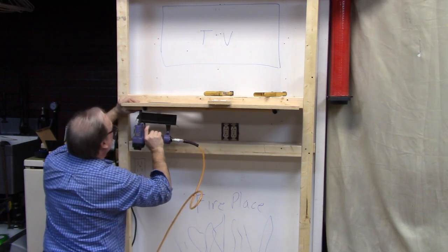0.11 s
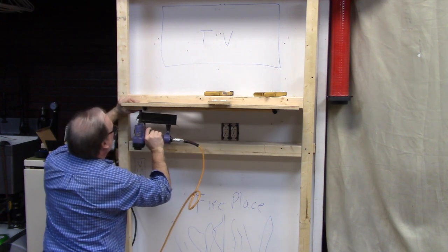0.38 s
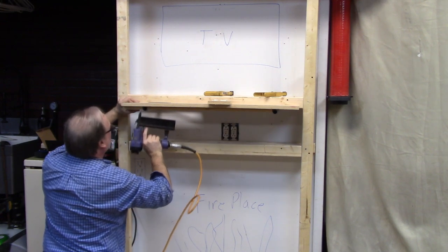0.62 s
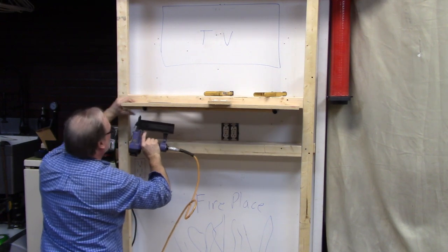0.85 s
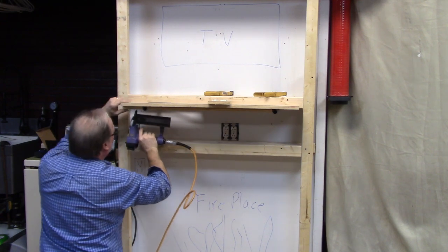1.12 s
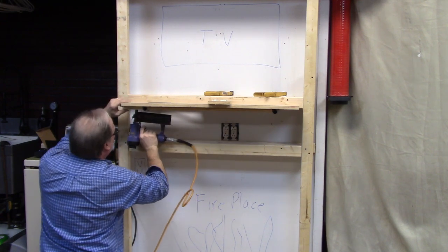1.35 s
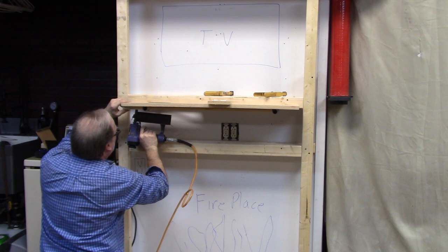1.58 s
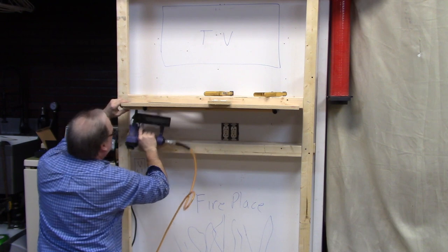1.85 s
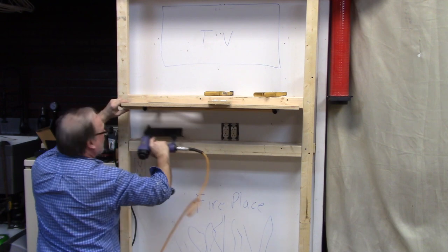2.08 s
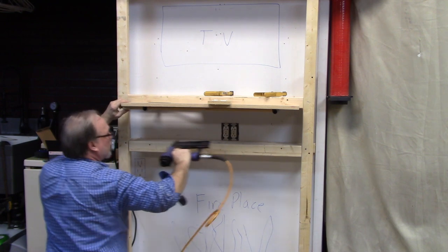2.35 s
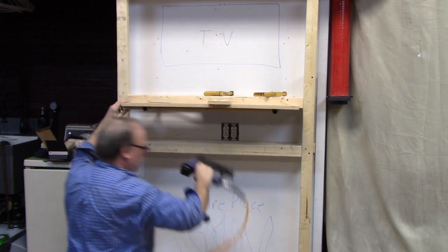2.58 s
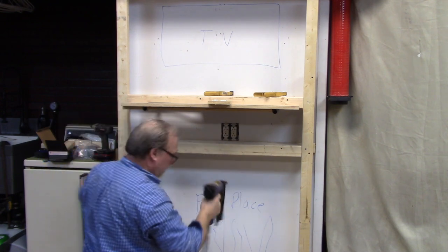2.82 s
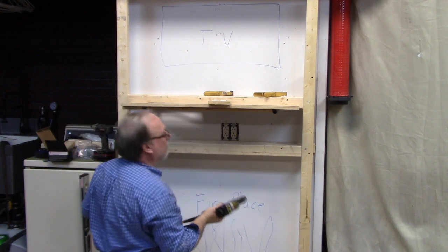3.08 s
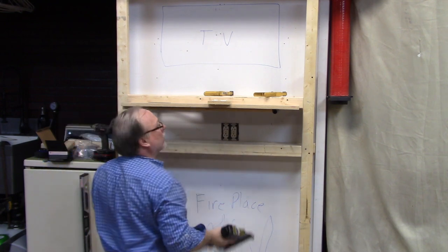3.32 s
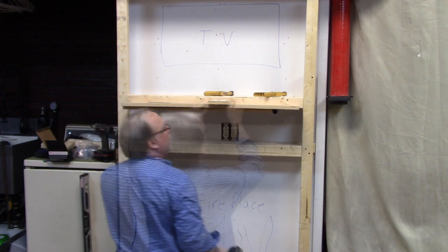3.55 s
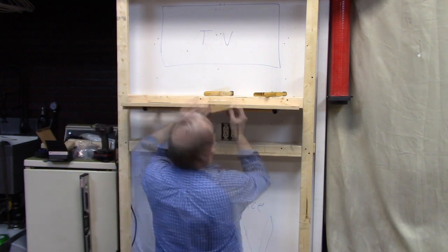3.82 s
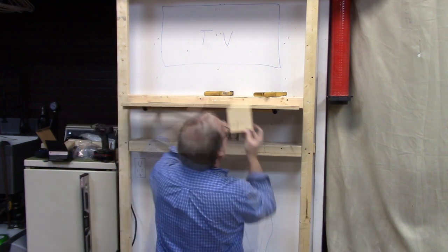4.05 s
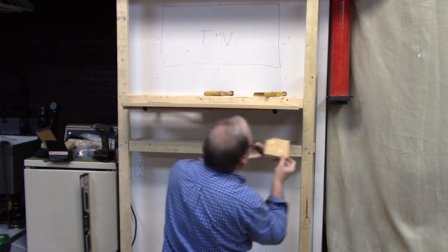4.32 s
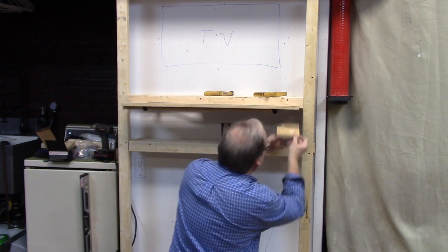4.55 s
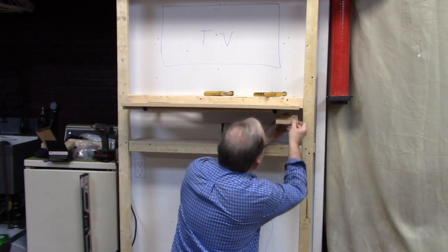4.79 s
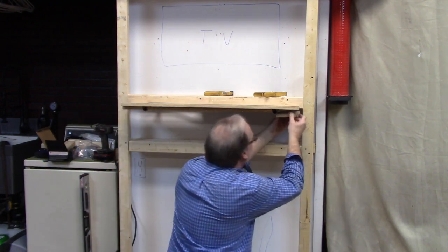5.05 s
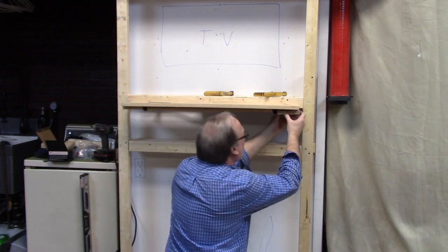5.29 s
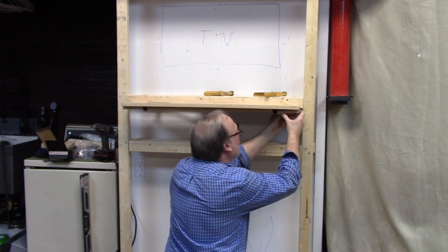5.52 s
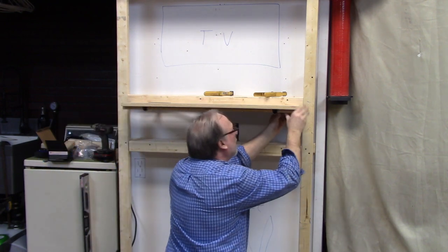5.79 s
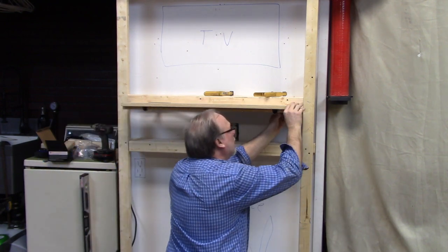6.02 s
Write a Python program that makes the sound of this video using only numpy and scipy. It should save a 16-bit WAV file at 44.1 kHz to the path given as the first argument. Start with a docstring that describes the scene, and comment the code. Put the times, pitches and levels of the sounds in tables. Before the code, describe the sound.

A workshop with a short ringing room and faint steady low air, heard by one fixed microphone; loud peaks are clamped. At 0 s a scraping tail dies away with low wooden knocks. At about 0.35 s an air nailer fires: a tiny hiss, a hard crack into wood, then at 0.53 s a bright exhaust puff and a return clack. Around 1.12-1.17 s tool bumps and dull wood thumps cluster with a short skid, and softer knocks follow at 1.34 s. The second, similar shot comes at 1.62 s, exhausting at 1.82 s. A bump at 1.95 s and small taps lead to clunks at 2.6 and 2.8 s, with raspy tool and hose drags until 3.5 s. A faint slide passes near 4 s. From 4.5 s a wood block scrapes, clicks at 4.72-4.77 s, knocks strongly at 4.93 s, then settles with lighter taps until 5.66 s and quiet air.

```python
"""In a workshop a dying tail and low knocks are heard, then an air nailer fires twice into a wooden frame.
Each shot is jets of coloured noise (valve hiss, blast, exhaust) and two hard stops of the piston.
Between and after the shots the tool and its hose bump, skid and drag: struck bodies ring, dense clicks rub.
After a faint slide, a small block is slid along a shelf and knocked into place.
All along the room rings on, steady air is heard, and a fast limiter holds the loud moments down."""
import sys
import numpy as np
from scipy import signal
from scipy.fft import rfft, irfft
from scipy.io import wavfile
from scipy.ndimage import uniform_filter1d

SR = 44100
rng = np.random.default_rng(int(sys.argv[2]) if len(sys.argv) > 2 else 0)


def to_wav(s):
    """Save 16-bit WAV."""
    ch = np.atleast_2d(s).T  # columns
    pcm = np.round(np.clip(ch, -1, 1) * 32767)  # PCM
    wavfile.write(sys.argv[1], SR, pcm.astype(np.int16))


def boost(x):
    """Linear amplitude factor 10**(x/20) for a level x in decibels (scalar or array-like)."""
    u = np.asarray(x, float) / 20
    return 10 ** u


N = 271215  # length in samples

# The shots. Each row: valve opens in seconds, trigger held in seconds, pressure in dB.
SHOTS = [(.341, .186, 0.5), (1.617, .1985, 1.5)]
# Colour of the air through the wide open valve. Each row: frequency in Hz, relative level in dB per Hz.
VALVE_COLOUR = [(88, -32), (150, -15.5), (913, -17.5), (1270, -8), (1840, -29.5), (2660, -0.5),
                (2930, -4.5), (3160, -3), (10300, -6.5), (15600, -6.5)]
# Colour of the piston driving the nail. Each row: frequency in Hz, relative level in dB per Hz.
DRIVE_COLOUR = [(30, -57), (60, -18), (250, -6.5), (450, -8.5), (700, -4), (1300, -1), (2200, -2.5),
                (2700, -12.5), (3500, -21), (4600, -34)]
# Colour of the air bursting out after the blow. Each row: frequency in Hz, relative level in dB per Hz.
BLAST_COLOUR = [(1470, -24.5), (2500, -10.5), (3610, -6), (3960, -8), (5050, -2.5), (8760, -17.5),
                (12700, -18.5), (15600, -38.5)]
# Colour of the exhaust and of the first thin jet. Each row: frequency in Hz, relative level in dB per Hz.
EXHAUST_COLOUR = [(880, -41), (1500, -2), (3280, -0.5), (3690, -15), (4580, -6.5), (5510, 7), (7110, 0.5),
                  (12800, -1.5), (15600, 5)]
# Colour of the piston's return stop. Each row: frequency in Hz, relative level in dB per Hz.
RETURN_COLOUR = [(29, -64.5), (50, -10.5), (147, -19), (300, -14), (330, -15), (357, -16.5), (661, -12),
                 (1270, 0.5), (1770, -11.5), (1950, -11), (2650, -16.5), (5000, -12.5), (6500, -69.5),
                 (11000, -120)]


def nailer():
    """Air jets are coloured noise; the piston's two stops are hard blows."""
    stroke_s, return_s = 0.043, 0.0275  # valve to blow, exhaust to return stop
    jet_db, flow_db, blow_db, blast_db, exhaust_db, return_db = -15.5, 0, 33.5, 7, 5, 29
    out = np.zeros(N)
    for valve, held, db in SHOTS:
        drive, exhaust = valve + stroke_s, valve + held
        # a thin jet first, then the full flow as the valve widens
        add(out, valve, boost(db + jet_db) * air_jet(0.0017, 0.013, EXHAUST_COLOUR))
        add(out, valve, boost(db + flow_db) * air_jet(0.007, 0.014, VALVE_COLOUR))
        add(out, drive, boost(db + blow_db) * piston_stop(DRIVE_COLOUR))
        add(out, drive, boost(db + blast_db) * air_jet(0.0018, 0.014, BLAST_COLOUR))
        add(out, exhaust, boost(db + exhaust_db) * air_jet(0.0072, 0.033, EXHAUST_COLOUR))
        add(out, exhaust + return_s, boost(db + return_db) * piston_stop(RETURN_COLOUR))
    return out


def air_jet(rise, fall, points):
    """Rushing air: a burst of noise (rise and fall in s) given its colour."""
    return signal.oaconvolve(burst(rise, fall), colour(points))


def piston_stop(points):
    """A hard stop of the piston: mostly one sharp push."""
    return signal.oaconvolve(strike(0.005, 2.2), colour(points))


def strike(length, first):
    """A sharp first touch, then a short rough contact that dies over the length (s); energy 1."""
    push = burst(0.00029, length, size=3000)
    push[0] = first * np.linalg.norm(push)
    return push / np.linalg.norm(push)


def burst(rise, fall, size=9000):
    """Noise under a rise and an exponential fall (time constants in s)."""
    t = np.arange(size) / SR
    envelope = (1 - np.exp(-t / rise)) ** 2 * np.exp(-t / fall)
    return envelope * rng.standard_normal(size)


# Ringing of frame and block. Each row: frequency in Hz, width in Hz (wider dies sooner), relative level in dB.
WOOD_MODES = [(101, 17, -21), (158.3, 35, -10), (238.8, 15, -4.5), (275.3, 12.8, 3), (408, 30, -6.5),
              (469, 46, 4), (531.5, 15, 4), (619, 40, 3.5), (700, 33, 5.5), (727, 46, 4.5), (824, 76, 7.5),
              (970, 110, 8), (1155, 137, 13), (1314, 120, 3), (1510, 120, -1), (1720, 200, 5.5),
              (2194, 125, -9.5), (2743, 100, -0.5), (3100, 170, -12), (3940, 250, -24), (4380, 300, -17)]
# Crack of a blow on wood. Each row: frequency in Hz, relative level in dB per Hz.
WOOD_CRACK = [(290, -52), (500, -1), (1290, -0.5), (2230, -12), (2650, -10.5), (3910, -14), (7260, -29),
              (10400, -31), (15600, -64)]
# Knocks on wood. Each row: start in seconds, peak level in dB before the mix, tilt in dB per octave,
# rounding in dB per octave squared, crack in dB against the ringing body.
WOOD_KNOCKS = [(0.0, -18.5, -24.5, -0.5, -17.5), (0.047, -22, -28, 4.5, -45), (1.138, -14, -27.5, 6, -23),
               (1.163, -13.5, -16, -16, -30), (1.34, -23, -8.5, 5, -13.5), (1.442, -45, -26, 9, -16.5),
               (2.231, -30, -4, 23, -31), (2.463, -32, -25, 24, -17), (4.527, -43, -17, -16, -19),
               (4.718, -20, 27, 11, -24), (4.731, -18, 16, 3, -24), (4.772, -16, 35, 23, -37),
               (4.928, -5.5, 7.5, 0.5, -23), (4.935, -7.5, 19, 3.5, -20), (5.101, -18.5, -11.5, 8.5, -11),
               (5.301, -20.5, -8, 3.5, -18), (5.329, -21.5, -16, 1, -17), (5.534, -39.5, -21, 7, -26),
               (5.664, -28.5, -8.5, 0, -12)]


def wood_knocks():
    """Knocks on frame and block: a rough contact on a soft surface rings the wood."""
    contact_s = 0.0053
    rows = [(*row, contact_s) for row in WOOD_KNOCKS]
    return knocks(rows, WOOD_MODES, WOOD_CRACK, first=0.25, give=0.00006)


# Ringing of tool body and hose fitting. Each row: frequency in Hz, width in Hz (wider dies sooner),
# relative level in dB.
TOOL_MODES = [(240.5, 66, -32.5), (400, 48, -29.5), (545, 20, -20.5), (650, 68, 9), (757, 160, 5),
              (889, 130, 13), (1116, 140, 14.5), (1980, 40, 5), (2494, 110, 17), (3730, 420, -7),
              (4760, 1100, -8.5), (6220, 1200, 21)]
# Crack of the tool's hard edges. Each row: frequency in Hz, relative level in dB per Hz.
TOOL_CRACK = [(290, -50), (500, -9.5), (1290, 0.5), (2400, -6.5), (4000, -8.5), (7260, -21.5), (10400, -17),
              (15600, -33.5)]
# Bumps of the tool. Each row: start in seconds, peak level in dB before the mix, tilt in dB per octave,
# crack in dB against the ringing body, length of contact in seconds.
TOOL_KNOCKS = [(1.119, -22, -2.5, -7, 0.004), (1.124, -19, -3, 2.5, 0.006), (1.146, -28.5, 4.5, 8, 0.005),
               (1.945, -18.5, -3, 2.5, 0.0017), (2.173, -36, -10, 19, 0.0071),
               (2.276, -37.5, -2, -27, 0.0032), (2.583, -36, 1, 9, 0.0032), (2.6, -21.5, -4.5, -7, 0.0045),
               (2.606, -20.5, -2, 7.5, 0.0027), (2.807, -19.5, -4.5, -9.5, 0.0029),
               (2.999, -39, -3, -3, 0.0041), (3.01, -30, 9, -2, 0.0024), (3.083, -42, -5, -3, 0.003),
               (3.103, -29, -12, -4, 0.0034), (3.404, -33, 4, 2, 0.0017), (3.468, -28.5, -2.5, 0.5, 0.008),
               (3.725, -51, 0, 15, 0.0025), (3.754, -42.5, -11, 0, 0.0022), (3.792, -38.5, -14, 3, 0.003),
               (3.819, -30.5, 2, -0.5, 0.0027), (3.829, -33, 11, 0, 0.0038), (4.298, -48, -15, 2, 0.0032),
               (4.359, -36, 4, 3, 0.0022)]


def tool_knocks():
    """Bumps of tool and hose: a sharper touch on a harder surface rings the tool."""
    rounding_db = 2  # per octave squared
    rows = [(s, db, tilt, rounding_db, crack, length) for s, db, tilt, crack, length in TOOL_KNOCKS]
    return knocks(rows, TOOL_MODES, TOOL_CRACK, first=0.5, give=0.00002)


def knocks(rows, modes, edge, first, give):
    """A touch and a short rough contact, softened by the surface's give (s), ring the body and throw a crack."""
    out, crack = np.zeros(N), colour(edge)
    soft = np.exp(-(np.arange(-40, 41) / SR / give) ** 2)
    soft /= soft.sum()
    for s, db, tilt_db, rounding_db, crack_db, length in rows:
        push = strike(length, first)
        softened = np.convolve(push, soft)
        body = signal.oaconvolve(softened, ring(modes, tilt_db, rounding_db))
        # softening delays the body by 40 samples, so the crack waits as long
        add(body, 40 / SR, boost(crack_db) * signal.oaconvolve(push, crack))
        loudest = np.sqrt(np.max(uniform_filter1d(body ** 2, size=300)))
        add(out, s, boost(db) * body / loudest)
    return out


def ring(modes, tilt_db, rounding_db):
    """Dying sines of a struck body; place and softness of the contact pick out a range of modes."""
    hz, width, db = np.transpose(modes)[:, :, None]
    t = np.arange(6000) / SR
    octaves = np.log2(hz / 600)
    weight = boost(db + tilt_db * octaves - rounding_db * octaves ** 2) * np.sqrt(width)
    sines = np.exp(-np.pi * width * t) * np.sin(2 * np.pi * hz * t)
    taps = (weight * sines).sum(0)
    return taps / np.linalg.norm(taps)


# Drags of the tool; the first row is a dying tail, likely of an earlier shot, and near 3.9 to 4.2 s
# comes a faint slide, perhaps the block leaving its shelf. Each row: hardest moment in seconds,
# rise in seconds, fall in seconds, body level in dB and rasp level in dB, both before the mix.
DRAGS = [(0.0, .01, 0.13, -31.5, -31), (1.125, 0.0048, .15, -27.5, -28), (1.17, 0.037, .08, -25.5, -40),
         (1.36, .01, 0.044, -40, -63), (1.428, 0.034, 0.055, -46.5, -53), (2.47, .01, 0.14, -49, -50),
         (2.594, 0.18, .02, -44, -39), (2.7, 0.28, 0.085, -37, -43), (2.75, .02, 0.23, -40, -30.5),
         (2.825, 0.17, 0.15, -29, -31), (2.875, 0.1, 0.21, -28.5, -29), (3.01, 0.097, 0.12, -34.5, -35),
         (3.115, 0.077, 0.15, -38.5, -31), (3.345, .03, .15, -42, -38), (3.388, .1, 0.11, -46, -32.5),
         (3.478, 0.021, 0.071, -35.5, -32.5), (3.6, 0.23, 0.22, -47.5, -65), (3.72, 0.49, .15, -56, -50.5),
         (3.862, .08, 0.35, -45.5, -45.5), (4.144, 0.64, 0.15, -44.5, -45), (4.3, 0.0043, 0.1, -50, -45),
         (4.372, 0.023, 0.091, -47, -39.5)]
# The tool skids after every bump. In order: fall in seconds, body and rasp in dB against the bump's level.
SCUFF = (0.03, -10.5, -10)
# Faint creak of the trigger, swelling slowly towards each shot and sinking slowly after it. # In order: rise in
# seconds (its sign is ignored), fall in seconds, body level in dB and rasp level in dB, # both before the mix.
TRIGGER_CREAK = (-2, 2.2, -47, -56)


def drags():
    """Drags, a dying tail, a faint slide, skids after bumps and a slow faint trigger creak, all in the tool's
    ringing."""
    lead_s = 0.014  # the trigger creak is hardest this long before the valve opens
    fall, body_db, rasp_db = SCUFF
    scuffs = [(s + length, length, fall, db + body_db, db + rasp_db) for s, db, *_, length in TOOL_KNOCKS]
    creaks = [(s - lead_s, *TRIGGER_CREAK) for s, *_ in SHOTS]
    return rubbing(DRAGS + scuffs + creaks, TOOL_MODES, tilt_db=-1.3, slips_per_s=5000, spread_db=1.8)


# Slides of the block along the shelf. Each row: hardest moment in seconds, rise in seconds,
# fall in seconds, body level in dB and rasp level in dB, both before the mix.
BLOCK_SLIDES = [(4.53, 0.012, 0.15, -34, -53), (4.57, 0.045, 0.63, -34, -34),
                (4.714, 0.19, 0.032, -26, -27), (4.738, 0.026, 0.078, -22.5, -22),
                (4.774, 0.028, 0.13, -31, -21.5), (4.915, 0.22, 0.019, -36.5, -45),
                (5.464, 0.1, .03, -71, -53), (5.52, 0.038, .2, -59, -56.5), (5.66, 0.32, .1, -46.5, -45.5),
                (6.0, .4, 0.13, -68, -68)]


def block_slides():
    """The small block slides along a shelf and rings as wood."""
    return rubbing(BLOCK_SLIDES, WOOD_MODES, tilt_db=1.0, slips_per_s=4000, spread_db=1.1)


# Colour of the rasp. Each row: frequency in Hz, relative level in dB per Hz.
RASP_COLOUR = [(880, -27), (1500, -1.5), (2070, 2.5), (2590, 0.5), (3690, 0.5), (4530, 0.5), (5350, 1),
               (7610, -10.5), (11800, -20), (15600, -29)]


def rubbing(strokes, modes, tilt_db, slips_per_s, spread_db):
    """Fibres catch and slip: a dense train of uneven clicks rings the body and rasps."""
    uneven = boost(spread_db * np.minimum(rng.exponential(1, N), 5))
    slips = uneven * (rng.random(N) < slips_per_s / SR)
    slips *= rng.choice([-1., 1.], N)
    body = evened(signal.oaconvolve(slips, ring(modes, tilt_db, 6.1))[:N])
    rasp = evened(signal.oaconvolve(slips, colour(RASP_COLOUR))[:N])
    s, rise, fall, body_db, rasp_db = np.transpose(strokes)
    rasp_haste = 1.19  # the rasp dies this much quicker
    return pressure(s, rise, fall, body_db) * body + pressure(s, rise, fall / rasp_haste, rasp_db) * rasp


def pressure(s, rise, fall, db):
    """Gain of a set of strokes: each climbs to its hardest moment and drops away, evenly in dB."""
    span_db = 22  # climbed within the rise time, dropped within the fall time
    grid = np.arange(0, N + 64, 64)
    t = grid / SR - s[:, None]
    away = np.maximum(-t / abs(rise[:, None]), t / abs(fall[:, None]))
    gains = boost(db[:, None] - span_db * away)
    return np.interp(np.arange(N), grid, np.linalg.norm(gains, axis=0))


# How long the room rings. Each row: frequency in Hz, time to die by 60 dB in seconds.
ROOM_DECAY = [(100, 0.57), (260, 0.5), (700, 0.42), (1840, 0.45), (4850, 0.44), (9000, 0.3), (14000, 0.19)]


def room(x, build=0.0018):
    """Dense taps of random sign build up (s), each band dying at its own speed; three tails taken in turn."""
    out = np.zeros(N)
    turn = np.arange(N) / SR * np.pi / 0.21
    for k in range(3):
        taps = np.zeros(SR)
        slots = np.arange(90, SR - 10, 10)
        at = slots + rng.integers(0, 10, len(slots))
        taps[at] = rng.choice([-1., 1.], len(at)) * (1 - np.exp(-at / SR / build))
        hz, t, z = signal.stft(taps, SR, nperseg=512)
        decay = boost(-60 * t / read(ROOM_DECAY, hz)[:, None])
        tail = signal.istft(z * decay, SR, nperseg=512)[1]
        # the squares of the three shares always add up to 1
        share = np.sqrt(2 / 3) * np.cos(turn + k * np.pi / 3)
        out += signal.oaconvolve(x * share, tail / np.linalg.norm(tail))[:N]
    return out


# Colour of the workshop's air. Each row: frequency in Hz, relative level in dB per Hz.
HUSH_COLOUR = [(12, -32), (20, 2.5), (232, 4), (290, 2.5), (352, 3.5), (405, -1.5), (520, -3.5),
               (768, -5.5), (1300, -10.5), (1460, -7.5), (1630, -6.5), (3180, -11.5), (10200, -17),
               (15600, -22.5)]


def hush():
    """Steady air of the workshop: coloured noise, swelling a little with slow sines."""
    t = np.arange(N) / SR
    rates = np.geomspace(0.3, 6, 20)  # Hz
    swell = evened(sum(np.sin(2 * np.pi * (f * t + rng.random())) / np.sqrt(f) for f in rates))
    spectrum = rfft(rng.standard_normal(N + 1))
    noise = irfft(spectrum * boost(read(HUSH_COLOUR, np.fft.rfftfreq(N + 1, 1 / SR))))[:N]
    return boost(-49 + 1.5 * swell) * evened(noise)


def evened(x):
    """Scales to rms 1."""
    return x / np.sqrt(np.mean(x ** 2) + 1e-20)


def read(points, hz):
    """Joins table points on a log-frequency axis."""
    f, value = np.transpose(points)
    return np.interp(np.log(hz + 1), np.log(f + 1), value)


def add(mix, s, sound):
    """Mixes a sound in at s seconds."""
    part = mix[max(round(s * SR), 0):][:len(sound)]
    part += sound[:len(part)]


def colour(points, size=4096):
    """Causal (minimum-phase) response of energy 1 with the given spectrum."""
    db = np.maximum(read(points, abs(np.fft.fftfreq(size, 1 / SR))), -100)
    log_gain = np.log(boost(db))
    taps = np.fft.ifft(np.exp(np.conj(signal.hilbert(log_gain)))).real[:size // 2]
    return taps / np.linalg.norm(taps)


def scene(low_hz=110):
    """Shots, knocks and strokes in the room, over its hush; everything but the hush is cut below 110 Hz."""
    shots = nailer()
    hits = wood_knocks() + tool_knocks()
    rubs = drags() + block_slides()
    near = boost(-2) * shots + boost(-3.5) * hits + boost(-3) * rubs
    heard = near + room(boost(-0.5) * shots + boost(-7.5) * hits + boost(-15) * rubs)
    no_bass = signal.butter(3, low_hz, "high", fs=SR, output="sos")
    return (signal.sosfilt(no_bass, heard) + hush())[None]


def low_pass(x):
    """Removes everything above the highest recorded frequency."""
    return signal.sosfilt(signal.butter(12, 15700, fs=SR, output="sos"), x)


def record(dry, knee_db=-8, attack=0.005, recovers_db=250, grip=1.32):
    """The limiter grips within moments (attack in s), lets go at a steady dB a second; what slips past clips."""
    r = np.exp(-1 / (attack * SR))
    power_db = 10 * np.log10(signal.lfilter([1 - r], [1, -r], dry[0] ** 2) + 1e-12)
    fall = np.arange(N) * recovers_db / SR
    peak_db = np.maximum.accumulate(power_db + fall) - fall
    over_db = np.maximum(peak_db - knee_db, 0)
    # the gain drops by grip dB for each dB over the knee
    held = dry / boost(grip * signal.lfilter([1 - r], [1, -r], over_db))
    return low_pass(np.clip(held, -1, 1))


dry = scene()
out = record(dry)
to_wav(out)
```